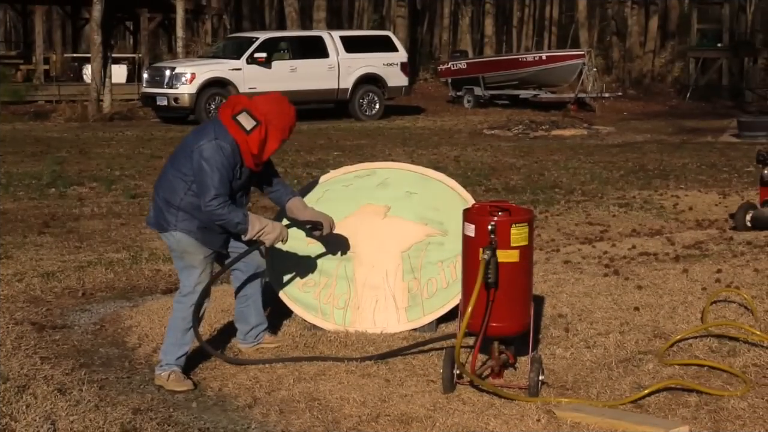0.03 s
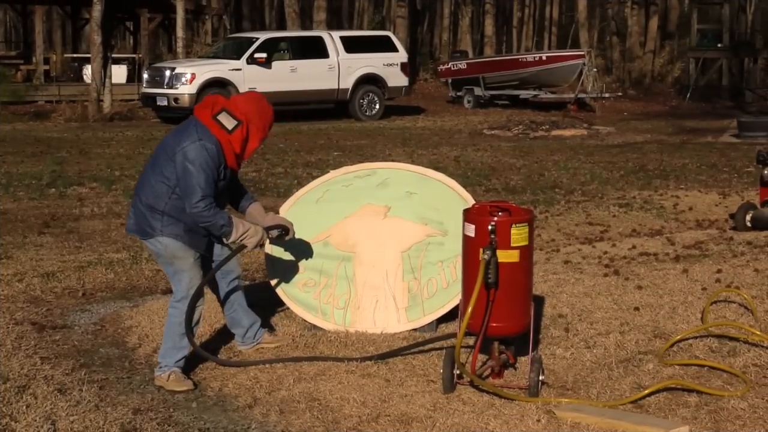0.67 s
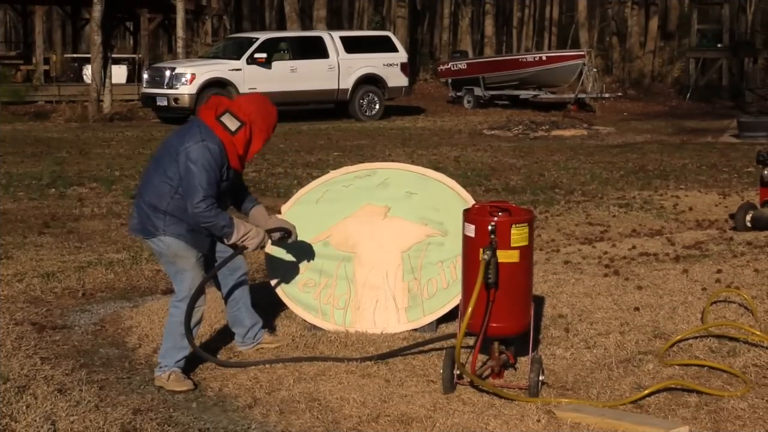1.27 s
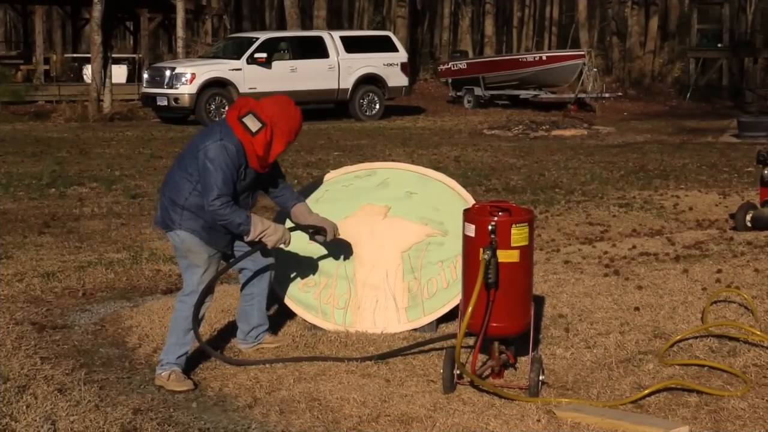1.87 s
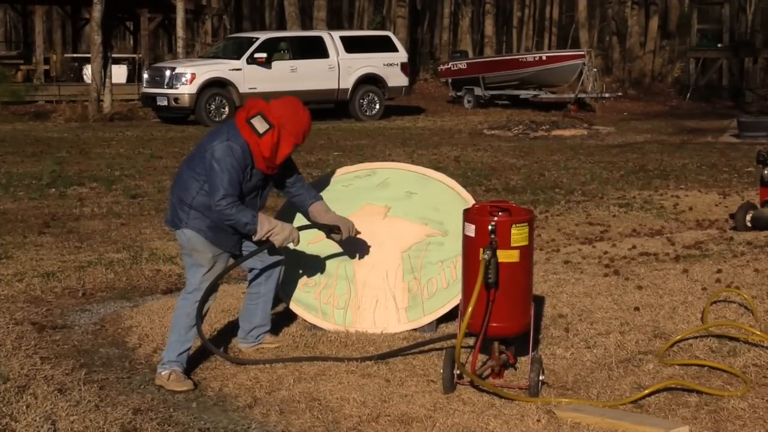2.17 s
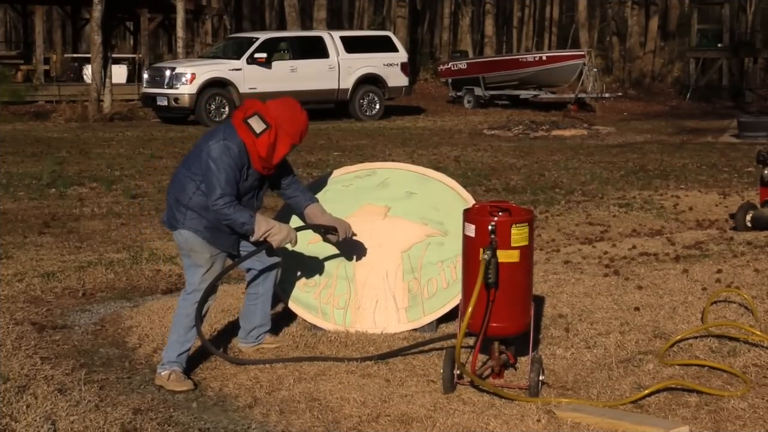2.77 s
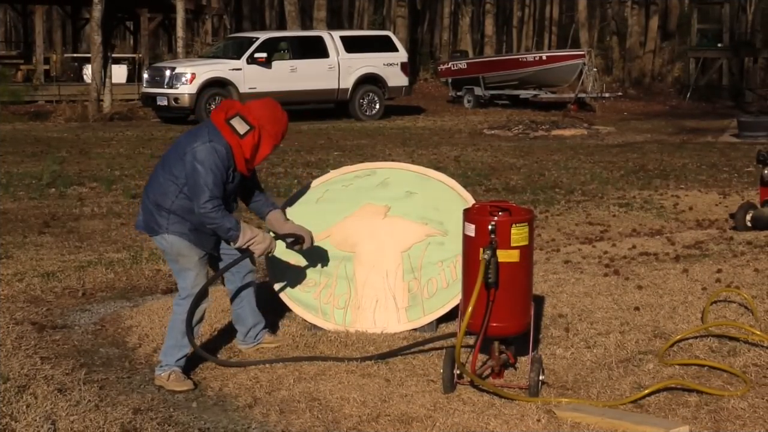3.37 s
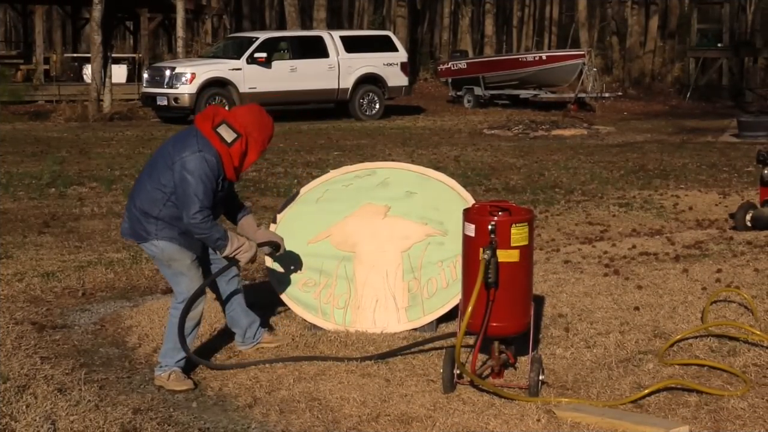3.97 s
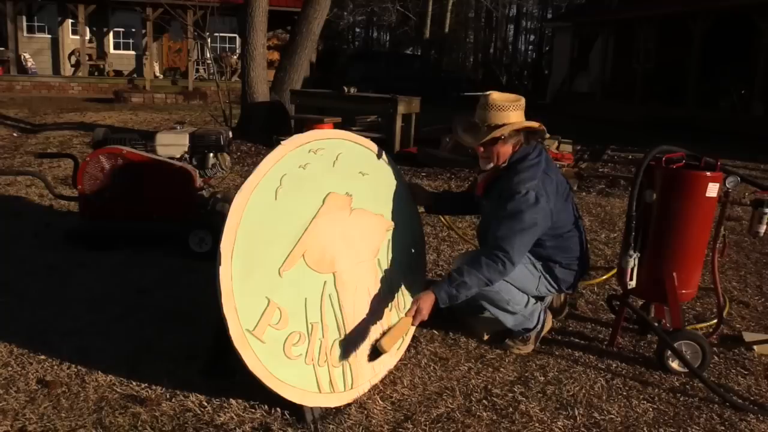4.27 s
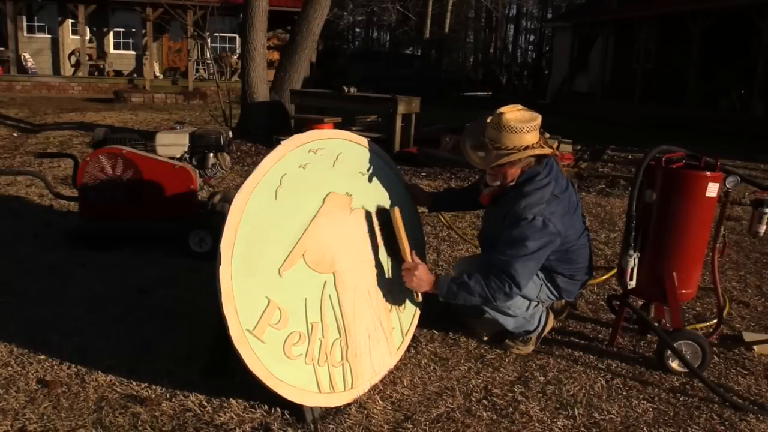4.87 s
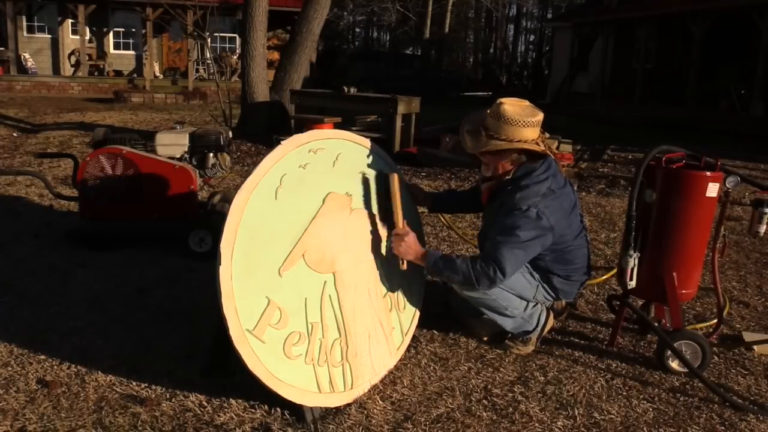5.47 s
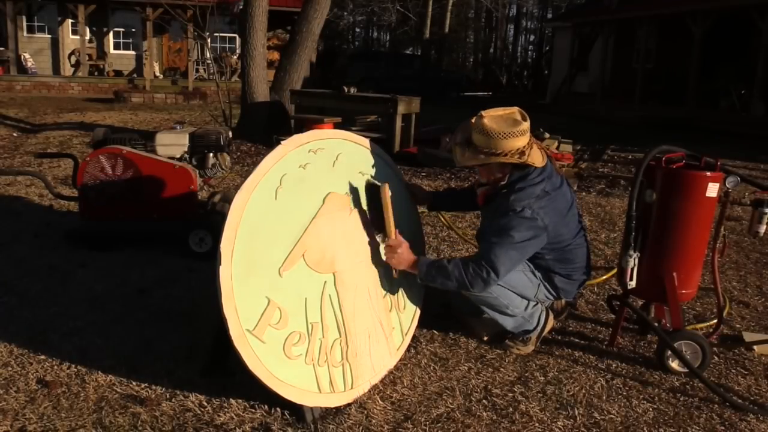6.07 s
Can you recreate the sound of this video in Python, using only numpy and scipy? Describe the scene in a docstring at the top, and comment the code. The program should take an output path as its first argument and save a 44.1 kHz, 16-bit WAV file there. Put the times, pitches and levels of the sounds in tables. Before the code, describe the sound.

A loud, gritty sandblaster hiss sweeps to and fro over wood in an open yard, with a compressor engine chugging low underneath. The hiss and engine cut off together, leaving several short, uneven scrapes of a bristle brush on a wooden board. Wind rumbles and thumps on the microphone, more strongly toward the end, along with faint light rattles and a few thin bird peeps.

```python
"""A harsh, sputtering hiss sweeps to and fro: a sandblaster on a wooden sign in a yard, its petrol
compressor chugging behind. Echoes off the ground and the board comb the hiss as the nozzle moves.
At 4.3 s the scene cuts to a hand brush scrubbing the sign in short strokes while a small bird peeps.
Wind buffets the microphone throughout, and something light rattles in the later gusts."""
import sys
import numpy as np
from scipy import signal
from scipy.fft import rfft, irfft, next_fast_len
from scipy.io import wavfile
from scipy.ndimage import map_coordinates

SR = 44100
rng = np.random.default_rng(int(sys.argv[2]) if len(sys.argv) > 2 else 0)


def waveform_to_disk(signal):
    """Save audio, clipped to [-1, 1], as 16-bit WAV at the path in sys.argv[1]."""
    frames = np.transpose(np.atleast_2d(signal))
    scaled = np.clip(frames, -1, 1) * 32767
    samples = np.round(scaled).astype(np.int16)
    wavfile.write(sys.argv[1], SR, samples)


N = 274364

# open-air bed: freq_hz, density_db
YARD_SPECTRUM = [(180, -28), (300, -6.5), (877, -27), (2250, -29), (4960, -35), (8560, -39), (13400, -46.5),
                 (15500, -63)]
# steady wind under the gusts: time_s, level_db, small_eddy_share (0 deep rumble, 1 lighter flutter)
BREEZE_CURVE = [(0, -38, 0.92), (1.6, -34, 1), (2.1, -48, .95), (3.1, -41, .85), (3.6, -34.5, 0.77),
                (4.28, -35, 0.72), (4.3, -29, 0.0085), (5.3, -27.5, 0.059), (5.75, -25.5, 0.23),
                (6.22, -31, 0.4)]
# swells of wind: peak_s, half_length_s, level_db
WIND_GUSTS = [(.01, 0.013, -22), (0.102, 0.017, -27), (0.277, 0.063, -25), (0.395, .04, -25),
              (0.443, 0.024, -25.5), (0.574, 0.024, -25), (0.741, 0.038, -23.5), (1.145, 0.098, -22),
              (1.25, 0.089, -27.5), (1.412, 0.02, -23), (1.48, .08, -34), (3.58, 0.053, -32),
              (4.31, 0.025, -24.5), (4.43, 0.033, -22), (4.587, 0.018, -24), (4.79, 0.048, -22.5),
              (4.892, .05, -24.5), (4.992, 0.044, -20.5), (5.206, 0.066, -28), (5.366, 0.037, -20.5),
              (5.86, .035, -21.5), (5.968, 0.039, -24.5), (6.215, 0.01, -19.5)]
# two wind colours, small eddies then large ones, each: freq_hz, density_db
EDDY_SPECTRA = [
    [(15, -59), (25, -44.5), (53, -42), (128, -7.5), (291, 0.5), (506, -4.5), (642, -12), (969, -19.5),
     (1050, -24.5), (1100, -19.5), (1430, -28), (2420, -120)],
    [(15, -47), (25, -49), (71, -10.5), (172, 1.5), (299, -1.5), (366, -7.5), (727, -30), (830, -32),
     (1350, -28), (1650, -29.5), (1930, -30.5), (2460, -32.5), (5000, -54), (6500, -93), (11000, -120)],
]
# single eddies that thump the microphone: start_s, relative_peak_db
EDDY_THUMPS = [(.444, -4), (4.786, -6.5), (4.992, -1), (5.018, -3), (5.212, -10), (5.559, -8)]
# brief chatter in the gusts: peak_s, half_length_s, pitch_hz, level_db
GUST_RATTLES = [(4.428, .0043, 1800, -36.5), (4.953, 0.0076, 1900, -38), (4.989, 0.0083, 1460, -35.5),
                (5.516, .007, 1490, -41.5), (5.563, .011, 1900, -40), (5.947, .006, 1700, -40),
                (6, 0.0083, 1500, -42), (6.208, .003, 1300, -37)]
# bird calls: start_s, length_s, start_hz, end_hz, level_db
BIRD_PEEPS = [(5.321, .03, 3230, 3130, -32.5), (5.602, .04, 3030, 3040, -44),
              (5.642, .026, 3060, 3040, -41), (5.688, .022, 3050, 3070, -42),
              (6.197, 0.01, 5300, 3970, -37)]
# muffler tone: multiple_of_firing_rate, relative_db
EXHAUST_HARMONICS = [(1, -45), (2, -47), (3, -25), (4, -21), (5, -11.5), (6, -16.5), (7, -17.5), (8, -9.5),
                     (9, -5.5), (10, -9), (11, 2.5), (12, -26), (13, -7), (14, -14.5), (15, -4.5),
                     (16, -17.5), (17, -13), (18, -19), (19, -24), (20, -12), (21, -10), (22, -19.5)]
# bristles on wood: freq_hz, density_db
BRISTLE_SPECTRUM = [(530, -15), (900, -8), (1050, -9), (1930, 0.5), (2600, -0.5), (3500, 6), (3850, 0.5),
                    (4550, 2), (5310, -3.5), (6980, 1), (7770, -1), (8440, 2), (10600, -6), (14300, -13),
                    (15500, -36)]
# scrubs: contact_s, attack_s, hold_s, hold_end_db, swell_db, hiss_over_scrape_db, tip_sizzle_db
BRUSH_STROKES = [(4.322, 0.044, 0.029, -48, -2, 0, -14), (4.422, 0.05, 0.039, -49, -2, 0, -14),
                 (4.613, 0.0067, 0.13, -28.5, 10, -1.5, 3.5), (4.746, .005, 0.0041, -34, 4, -10, 0),
                 (4.773, .02, .07, -42, 1, 0.5, 8), (5.253, .06, 0.025, -29, 8.5, -2, 7),
                 (5.306, .03, 0.064, -39.5, 5.5, 0, 12.5), (5.374, 0.028, 0.047, -30, -3, 4, -2.5),
                 (5.676, 0.0084, 0.0046, -31, 0.5, -6.5, 5), (5.825, 0.049, 0.098, -31, -5, 4.5, -1)]
# free jet of air: freq_hz, density_db
AIR_SPECTRUM = [(500.0, -36.5), (900.0, -16), (1100.0, -19.5), (1770.0, -7.5), (2700.0, -7.5), (4500.0, -4),
                (5700.0, -6.5), (7200.0, -3.5), (9000.0, -6.5), (10500.0, -5.5), (14000.0, -6.5),
                (15500.0, -18.5)]
# nozzle resonances and dips: centre_hz, half_width_hz, lift_db
NOZZLE_MODES = [(2000, 570, 0), (3957, 180, -6.5), (5850, 450, 4.5), (7150, 900, 2.5), (8520, 500, 6.5),
                (9630, 590, 8), (11650, 630, 3), (12900, 450, 2.5)]
# the nozzle's swing: time_s, reach (0 at the board's rim, about 1 far in), peak_hz, hollow_depth_db
NOZZLE_SWEEP = [(0, .5, 3250, 2), (.25, .8, 3300, 1.5), (.45, .98, 3500, 2), (.68, .64, 3600, 2),
                (.8, .47, 3150, 0), (.95, .24, 3500, 4), (1.1, .03, 3700, 2), (1.28, .1, 3500, 4),
                (1.43, .42, 3150, 1.5), (1.58, .84, 3600, 1.5), (1.85, 1.04, 3550, 3), (2.25, .85, 3550, 1),
                (2.45, 1.05, 3550, 0), (2.72, .76, 3500, 0), (2.88, .56, 3500, 3), (3.12, .56, 3500, 3),
                (3.36, .66, 3500, 4.5), (3.68, .29, 3550, 3), (3.82, .18, 3300, 1), (4, .13, 3500, 3),
                (4.28, .11, 3350, 2)]
# one flare of hiss, far in over the board: peak_s, half_length_s, centre_hz, half_width_hz, lift_db
HISS_FLARE = (2.61, 0.22, 5900, 1500, 6.1)
# loudness of the jet's three bands; the top flickers unevenly: time_s, roar_db, hiss_db, fizz_db
JET_LEVELS = [(0.0, -19.5, -18.5, -23), (0.11, -20.5, -19.5, -22.5), (0.32, -22, -22.5, -25.5),
              (0.36, -21.5, -19, -20), (0.64, -22.5, -19, -32), (0.69, -22, -19, -18),
              (0.79, -23, -20, -19.5), (0.87, -22, -26, -24.5), (1.04, -21.5, -23, -27),
              (1.16, -20, -20.5, -20.5), (1.29, -17, -20, -21), (1.48, -22, -18.5, -15),
              (1.66, -21.5, -17.5, -29), (1.78, -21, -20.5, -23), (2.07, -18.5, -15.5, -20.5),
              (2.13, -19.5, -15.5, -26), (2.43, -19, -23.5, -22.5), (2.57, -18, -21, -31),
              (2.87, -18.5, -24, -25), (2.97, -18, -16, -24), (3.09, -18, -16, -26),
              (3.23, -19, -17.5, -18), (3.34, -18.5, -19.5, -24), (3.59, -18.5, -15, -18.5),
              (3.72, -25, -18.5, -23), (3.81, -23.5, -18.5, -19), (4.02, -23.5, -22, -24.5),
              (4.16, -21, -16, -20), (4.2, -21.5, -18, -24), (4.28, -21, -16.5, -21.5)]
# clumps of grit in the jet: peak_s, half_length_s, lift_db
GRIT_SPURTS = [(.73, 0.073, 0.5), (2.094, 0.017, 0), (3.215, .012, 2.5), (3.245, 0.025, 1),
               (3.423, 0.041, 2)]

BLAST_END_S, FIRING_HZ, TOP_HZ = 4.291, 28.2, 15600
RELEASE_S = .022  # the bristles lift off: time to fall by 20 dB
PEAK_WIDTH_HZ, HOLLOW_HZ, HOLLOW_HZ_PER_REACH = 690, 5410, -950
GROUND_GAIN, GROUND_MS, GROUND_MS_PER_REACH = .44, .649, .12
BOARD_GAIN, BOARD_DB_PER_REACH = -.16, -8  # the board's echo is inverted
BOARD_MS, BOARD_MS_PER_REACH = .33, .43


def amp(db):
    """Decibels to gain."""
    return 10 ** (np.asarray(db) / 20)


def unit(x):
    """Scale to rms 1."""
    return x / np.sqrt(np.mean(x ** 2) + 1e-20)


def clock():
    """The time of every sample, in seconds."""
    return np.arange(N) / SR


def bell(x, centre, half_width):
    """A smooth bump of height 1."""
    return np.exp(-2 * ((x - centre) / half_width) ** 2)


def eq_gain(spectrum, hz):
    """Gain of an EQ curve of (freq_hz, level_db) points, read on a log axis."""
    freqs, db = np.transpose(spectrum)
    return amp(np.interp(np.log(hz + 1), np.log(freqs + 1), db))


def curves(rows, t):
    """Automation lanes: each column after the first, read at times t."""
    times, *columns = np.transpose(rows)
    return [np.interp(t, times, column) for column in columns]


def cut_at(end_s, fade_s):
    """Full level, then a fade to silence centred on end_s."""
    return np.clip((end_s - clock()) / fade_s + .5, 0, 1)


def wobble(rate):
    """A smooth random curve, rate knots a second."""
    return map_coordinates(rng.standard_normal(int(N * rate / SR) + 4), [clock() * rate])


def filtered(x, response):
    """Shape x with a gain that depends on frequency."""
    size = next_fast_len(N + SR // 2)
    return irfft(rfft(x, size) * response(np.fft.rfftfreq(size, 1 / SR)), size)[..., :N]


def noise(spectrum):
    """Coloured noise of rms 1."""
    return unit(filtered(rng.standard_normal(N), lambda hz: eq_gain(spectrum, hz)))


def ring(spectrum, size=8192):
    """The minimum-phase impulse response of a body with this spectrum."""
    cepstrum = irfft(np.log(eq_gain(spectrum, np.fft.rfftfreq(size, 1 / SR)) + 1e-6))
    cepstrum[1:size // 2] *= 2
    cepstrum[size // 2 + 1:] = 0
    return irfft(np.exp(rfft(cepstrum)))


def split(x, edge_hz, order=10):
    """Crossover: the parts of x below and above an edge."""
    low = filtered(x, lambda hz: 1 / (1 + (hz / edge_hz) ** order))
    return low, x - low


def delayed(x, ms, oversample=4):
    """x behind a moving delay, read between samples."""
    fine = signal.resample_poly(x, oversample, 1)
    return map_coordinates(fine, [(clock() - ms / 1000) * SR * oversample], order=1)


def impacts(rate, spread_db):
    """Random tiny impacts of very unequal size, rms 1."""
    hits = rng.random(N) < rate / SR
    sizes = amp(spread_db * rng.standard_normal(N))
    signs = np.sign(rng.standard_normal(N))
    return unit(hits * sizes * signs)


def stereo(x, width_db):
    """Scattered sound differs between left and right, mostly in the treble."""
    scatter = rng.standard_normal(SR // 50)
    diffuse = signal.fftconvolve(x, scatter / np.linalg.norm(scatter))[:N]
    side = amp(width_db) * filtered(diffuse, lambda hz: hz ** 2 / (hz ** 2 + 6500 ** 2))
    return np.array([x + side, x - side])


def yard():
    """A faint steady rustle of the open air."""
    return stereo(amp(-41.5 + .39 * wobble(11)) * noise(YARD_SPECTRUM), width_db=-1.5)


def wind():
    """Gusts swell out of a breeze and buffet the microphone in lumps; the hardest eddies thump."""
    breeze_db, small_share = curves(BREEZE_CURVE, clock())
    gust_power = sum(amp(db) ** 2 * bell(clock(), s, half_s) for s, half_s, db in WIND_GUSTS)
    force = np.sqrt(amp(breeze_db) ** 2 + gust_power)
    lumps = unit(amp(1.3 * wobble(70)))
    flutter = np.sqrt(small_share) * noise(EDDY_SPECTRA[0])
    rumble = np.sqrt(1 - small_share) * noise(EDDY_SPECTRA[1])
    kicks = np.zeros(N)
    for start_s, db in EDDY_THUMPS:
        kicks[round(start_s * SR)] = amp(db - 9)
    thump = ring([(30, -45), (100, -7.5), (200, -6), (330, .5), (700, -19), (1500, -34), (4000, -102)])
    thumps = signal.fftconvolve(kicks, thump / np.abs(thump).max())[:N]
    return force * lumps * (flutter + rumble) + thumps


def rattles():
    """Something light chatters in the gusts: tiny bursts of ringing noise, spread wide."""
    out = np.zeros(N + SR)
    t = np.arange(SR // 5) / SR - .1
    for peak_s, half_s, hz, db in GUST_RATTLES:
        ringing = signal.lfilter(*signal.iirpeak(hz, Q=3.5, fs=SR), rng.standard_normal(len(t)))
        chatter = unit(signal.lfilter(*signal.iirpeak(hz, Q=1.5, fs=SR), ringing))
        start = round((peak_s + t[0]) * SR)
        out[start:start + len(t)] += amp(db) * np.exp(-(t / half_s) ** 2) * chatter
    return stereo(out[:N], width_db=14)


def bird():
    """Short, thin whistles from the trees, each a gliding sine."""
    out = np.zeros(N)
    for start_s, length_s, start_hz, end_hz, db in BIRD_PEEPS:
        progress = np.clip((clock() - start_s) / length_s, 0, 1)
        pitch_hz = start_hz + (end_hz - start_hz) * progress
        out += amp(db) * np.sin(np.pi * progress) * np.sin(2 * np.pi * np.cumsum(pitch_hz) / SR)
    return out


def compressor():
    """Each firing of a single cylinder rings the muffler; the governed speed barely drifts."""
    rate_hz = FIRING_HZ * (1 + .002 * wobble(3))
    cycle = np.floor(np.cumsum(rate_hz) / SR)
    firings = np.diff(cycle, prepend=0) * amp(.54 * wobble(FIRING_HZ))
    muffler = [(order * FIRING_HZ, db) for order, db in EXHAUST_HARMONICS]
    muffler += [(720, -24.5), (950, -32.5), (1270, -16.5), (3000, -50), (8000, -89)]
    chug = unit(signal.fftconvolve(firings, ring(muffler))[:N])
    return amp(-35.5) * chug * cut_at(BLAST_END_S, fade_s=.004)


def brush():
    """Stiff bristles flick over the blasted grain; each stroke lands, swells or eases, and lifts off."""
    flicks = rng.standard_normal(N) + amp(-4.5) * impacts(rate=2700, spread_db=5)
    bristles = filtered(flicks, lambda hz: eq_gain(BRISTLE_SPECTRUM, hz))
    scrape, treble = map(unit, split(bristles, edge_hz=5050))
    hiss, sizzle = split(treble, edge_hz=9700, order=20)
    out = np.zeros(N)
    for contact_s, attack_s, hold_s, end_db, swell_db, hiss_db, tips_db in BRUSH_STROKES:
        t = clock() - contact_s
        contact_db = 20 * (np.minimum(t, 0) / attack_s - np.maximum(t - hold_s, 0) / RELEASE_S)
        force_db = end_db + swell_db * (np.clip(t / hold_s, 0, 1) - 1)
        top_end = amp(hiss_db) * (hiss + amp(tips_db) * sizzle)
        out += amp(contact_db + force_db) * (scrape + top_end)
    ridges = amp(.84 * wobble(200))  # the bristles catch on the carved relief
    return stereo(out * ridges, width_db=-8)


def nozzle_gain(hz):
    """The jet's tone: broad air noise shaped by the nozzle's resonances."""
    modes_db = sum(db * bell(hz, centre, width) for centre, width, db in NOZZLE_MODES)
    return eq_gain(AIR_SPECTRUM, hz) * amp(modes_db)


def hiss_colour(jet, size=512):
    """A gliding peak and one flare colour the hiss; a hollow deepens the ground echo's 5 kHz notch."""
    hz, t, spectrum = signal.stft(jet, SR, nperseg=size)
    hz = hz[:, None]
    reach, peak_hz, depth_db = curves(NOZZLE_SWEEP, t)
    peak_db = 6.3 * bell(hz, peak_hz, PEAK_WIDTH_HZ)
    hollow_hz = HOLLOW_HZ + HOLLOW_HZ_PER_REACH * reach
    shoulder = .7 * bell(hz, hollow_hz - 750, 450)
    hollow_db = depth_db * (shoulder - 1.3 * bell(hz, hollow_hz, 560))
    flare_s, half_s, flare_hz, width_hz, lift_db = HISS_FLARE
    flare_db = lift_db * bell(t, flare_s, half_s) * bell(hz, flare_hz, width_hz)
    return signal.istft(spectrum * amp(peak_db + flare_db + hollow_db), SR, nperseg=size)[1][:N]


def echoes(jet):
    """The ground mirrors the treble and the board the mids; both paths lengthen with the reach."""
    reach = curves(NOZZLE_SWEEP, clock())[0]
    treble = split(jet, edge_hz=4800, order=5)[1]
    above_bass = split(jet, edge_hz=1340, order=6)[1]
    mids = split(above_bass, edge_hz=8200, order=4)[0]
    ground = delayed(treble, GROUND_MS + GROUND_MS_PER_REACH * reach)
    board = delayed(mids, BOARD_MS + BOARD_MS_PER_REACH * reach)
    return GROUND_GAIN * ground + BOARD_GAIN * amp(BOARD_DB_PER_REACH * reach) * board


def sandblaster():
    """Turbulent air and grit ring the nozzle; two moving echoes cut gliding notches into the hiss."""
    air_and_grit = rng.standard_normal(N) + amp(-11) * impacts(rate=3500, spread_db=3.5)
    jet = hiss_colour(filtered(air_and_grit, nozzle_gain))
    roar, treble = split(jet + echoes(jet), edge_hz=6200)
    hiss, fizz = split(treble, edge_hz=10300, order=20)
    roar_db, hiss_db, fizz_db = curves(JET_LEVELS, clock())
    blast = amp(roar_db) * unit(roar)
    blast += amp(hiss_db + .7 * wobble(22)) * unit(hiss)
    blast += amp(fizz_db + .9 * wobble(22)) * unit(fizz)
    # the sand feeds unevenly, so the whole jet sputters
    feed_db = .33 * wobble(34.7) + .5 * wobble(240) - .6
    spurts_db = sum(db * bell(clock(), s, half_s) for s, half_s, db in GRIT_SPURTS)
    blast *= amp(feed_db + spurts_db) * cut_at(BLAST_END_S, fade_s=.0074)
    return stereo(blast, width_db=-20)


def scene():
    """The full mix at the microphone."""
    return sandblaster() + brush() + yard() + compressor() + wind() + rattles() + bird()


def record(dry):
    """The microphone chain rounds off the highest peaks, trims the deep bass and cuts the very top."""
    rounded = dry / (1 + np.abs(dry / .85) ** 8) ** (1 / 8)
    mic_eq = [(30, -6), (60, -4), (90, .5), (14000, -.5), (15000, -4), (15600, -9)]
    shaped = filtered(rounded, lambda hz: eq_gain(mic_eq, hz))
    return filtered(shaped, lambda hz: hz < TOP_HZ)


dry = scene()
out = record(dry)
waveform_to_disk(out)
```